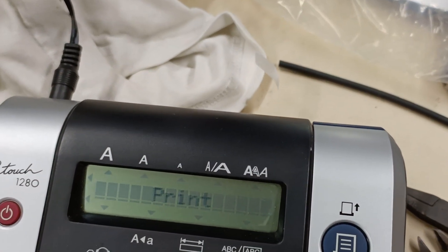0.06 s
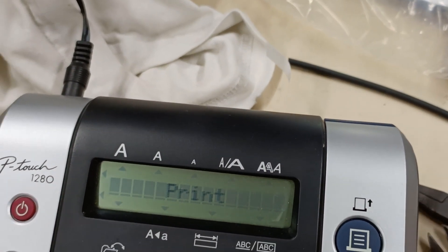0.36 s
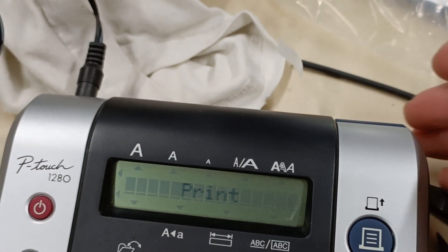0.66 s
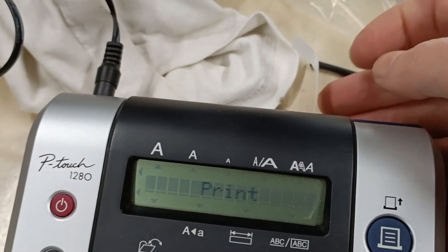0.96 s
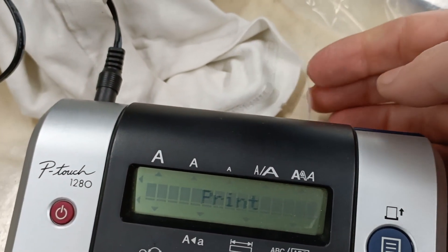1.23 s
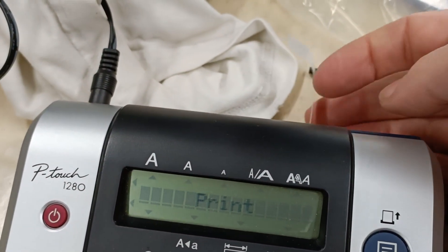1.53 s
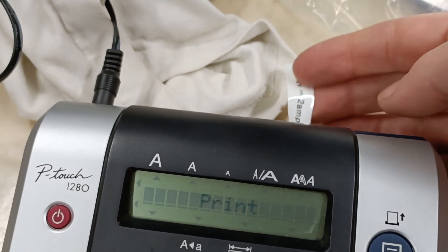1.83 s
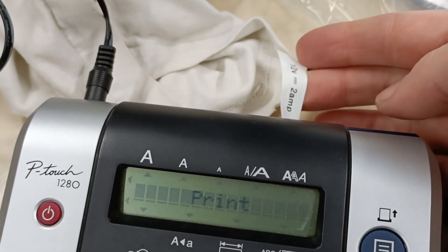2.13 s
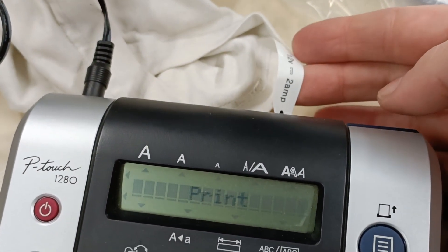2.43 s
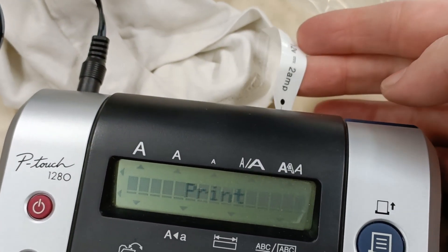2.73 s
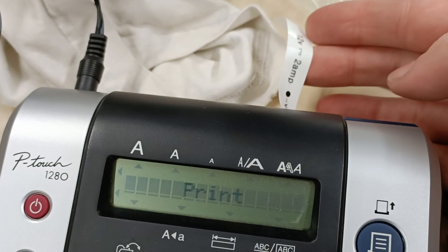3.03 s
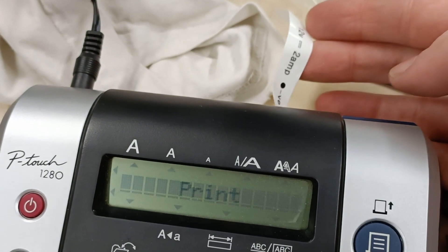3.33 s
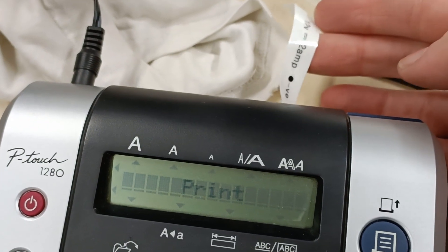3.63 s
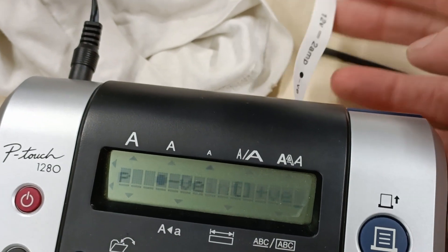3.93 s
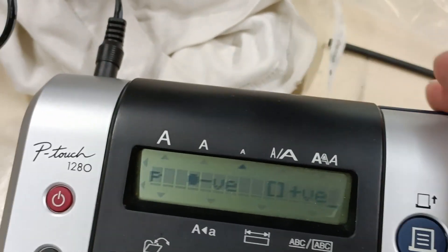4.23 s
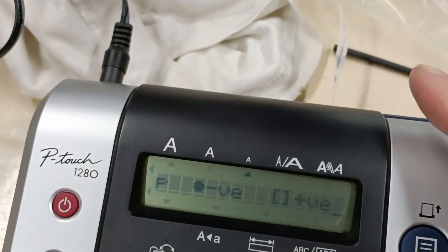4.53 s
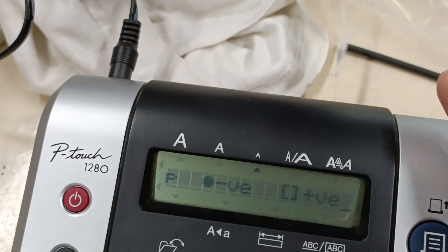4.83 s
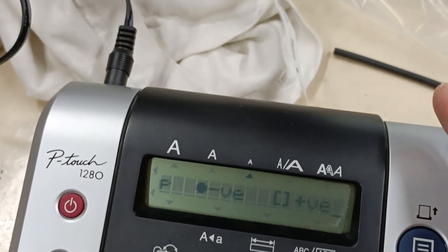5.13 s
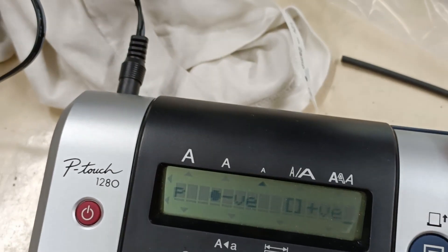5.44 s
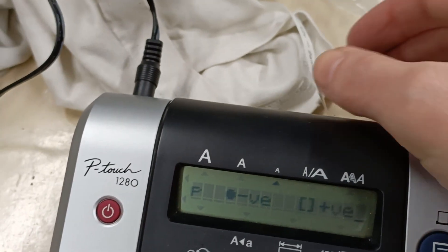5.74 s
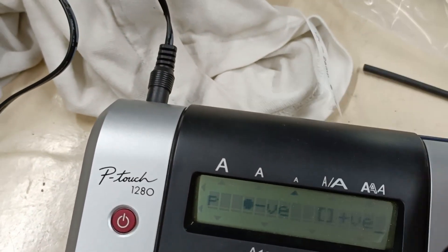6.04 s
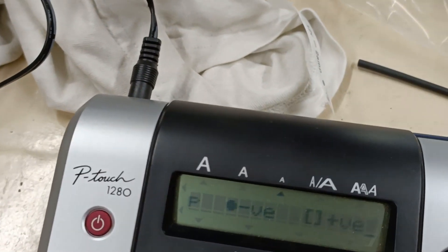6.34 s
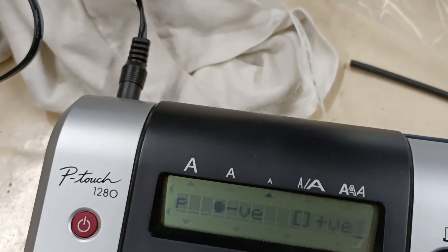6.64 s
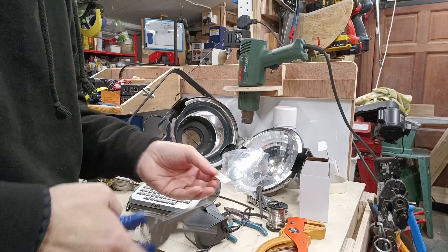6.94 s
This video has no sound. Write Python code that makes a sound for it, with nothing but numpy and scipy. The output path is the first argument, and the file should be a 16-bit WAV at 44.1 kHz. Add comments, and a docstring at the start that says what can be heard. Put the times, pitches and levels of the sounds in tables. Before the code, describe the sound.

Close up on a workbench, a label printer feeds tape with a slightly wavering gear whine and small crackling ticks. It stops about halfway through, leaving light taps and brushing on hollow plastic. Then comes a short creak, a loud cluster of cutter snaps and the clack of the lever springing back. Soft handling trails off into the low hiss and hum of a small workshop.

```python
"""Label printer on a workbench.

A small workshop with a faint mains buzz, a phone's two microphones close to the printer. The geared
motor whines and feeds crackling tape, then stops. Fingers brush the tape and press the cutter lever:
it creaks, the blade snaps through and chatters, and the lever clacks back into the plastic case."""
import sys
import numpy as np
from scipy import signal
from scipy.fft import rfft, irfft, next_fast_len
from scipy.io import wavfile
from scipy.ndimage import map_coordinates

SR = 44100
rng = np.random.default_rng(int(sys.argv[2]) if len(sys.argv) > 2 else 0)


def master_out(mix):
    """Clip the mix to full scale and print it as 16-bit PCM to the path in sys.argv[1]."""
    frames = np.transpose(np.atleast_2d(mix))
    ceiling = np.clip(frames, -1, 1)
    pcm = np.round(ceiling * 32767).astype(np.int16)
    wavfile.write(sys.argv[1], SR, pcm)


N = 312228
T = np.arange(N) / SR
FEED_STOP_S, TOP_HZ = 3.562, 12200


def undb(db):
    """Decibels to gain."""
    return 10 ** (np.asarray(db) / 20)


def unit(x):
    """Scale to rms 1."""
    return x / np.sqrt(np.mean(x ** 2))


def add(out, s, sound):
    """Mix a sound in at time s."""
    start = max(int(s * SR), 0)
    out[:, start:start + sound.shape[-1]] += sound[:, :N - start]


def walk(rate, size=N):
    """Smooth random wander of spread near 1, with `rate` turns a second."""
    steps = np.arange(size) * rate / SR
    return np.interp(steps, np.arange(size), rng.standard_normal(size)) * np.sqrt(3 / 2)


def octaves(size):
    """Pitch of each spectral bin in octaves."""
    return np.log2(np.maximum(np.fft.rfftfreq(size, 1 / SR), 10))


def shape_db(points, size):
    """Spread a table of f/Hz, level/dB over the spectral bins."""
    hz, db = np.transpose(points)
    return np.interp(octaves(size), np.log2(hz), db)


def colour(x, points, tilt_db=0):
    """Causal filter of unit power: the given spectrum, tilted per octave above the bass."""
    size = 2 * next_fast_len(x.shape[-1] // 2 + 1024)
    above_top = octaves(size) - np.log2(TOP_HZ)
    top_cut_db = 100 * np.clip(above_top + .08, 0, .6)
    gain = unit(undb(shape_db(points, size) + tilt_db * np.maximum(above_top, -4) - top_cut_db))
    cepstrum = irfft(np.log(gain))
    cepstrum[1:size // 2] *= 2  # fold to minimum phase
    cepstrum[size // 2 + 1:] = 0
    return irfft(rfft(x, size) * np.exp(rfft(cepstrum)))[..., :x.shape[-1]]


def resonate(x, peaks):
    """Band-pass resonances side by side, each applied twice for deep valleys; unit power."""
    size = 2 * next_fast_len(x.shape[-1] // 2 + 2048)
    f = np.maximum(np.fft.rfftfreq(size, 1 / SR), 1)
    gain = sum(undb(db) / (1 + 1j * (f - hz * hz / f) / (2 * width)) ** 2 for hz, width, db in peaks)
    return irfft(rfft(x, size) * gain / np.sqrt(np.mean(abs(gain) ** 2)))[..., :x.shape[-1]]


def ring(modes, size=8192, tilt_db=0):
    """Struck modes, a little different at every blow; the high ones reach the two mics out of step."""
    out, t = 0, T[:size]
    for k, (hz, db, t60) in enumerate(modes):
        strength_db, detune, lag = rng.standard_normal(3)
        mic_phase = np.array([[1], [-1]]) * lag * min((hz / 1300) ** 2, 1)
        wave = np.sin(2 * np.pi * hz * (1 + .002 * detune) * t + mic_phase)
        gain = undb(db + strength_db + tilt_db * np.log2(hz / 3500))
        out = out + (-1) ** k * gain * wave * np.exp(-np.log(1000) * t / t60)
    return out


# Stereo width at the phone, side against mid: f/Hz, level/dB
STEREO_WIDTH = [(30, -4), (130, -15), (550, -15), (850, -8), (1150, 1), (2000, 0), (12000, 0)]
def noise(size):
    """White noise at the two mics: alike in the bass, unrelated in the treble."""
    full = 2 * next_fast_len(size // 2 + 1)
    mid, side = rfft(rng.standard_normal((2, full)))
    width = undb(shape_db(STEREO_WIDTH, full))
    return irfft(np.array([mid + width * side, mid - width * side]) / np.sqrt(1 + width ** 2))[:, :size]


def grains(spread_db, rate, size=N):
    """Grainy noise whose level flickers `rate` times a second."""
    return unit(noise(size) * undb(spread_db * walk(rate, size)))


def burst(decay_s, size=8192, rise_s=.00028):
    """Chatter of two surfaces that meet: it builds, holds for a moment, then dies."""
    fade = (1 - np.exp(-T[:size] / rise_s)) * np.exp(-(T[:size] / decay_s) ** 1.2)
    return unit(noise(size) * fade) * np.sqrt(np.mean(fade ** 2))


# Room tone and mains buzz, behind the printer: f/Hz, level/dB
ROOM_TONE = [(20, -18.5), (65, -5.5), (110, -9), (200, -6.5), (330, -9), (480, -14), (780, -18.5),
             (1100, -20.5), (1700, -25), (2500, -21), (4500, -29.5), (7000, -27.5), (11000, -32),
             (11900, -46)]
MAINS_BUZZ = [(1000, -34), (4600, -19), (5700, -5.5), (6900, 0), (8000, -5), (9300, -3.5), (11200, -19),
              (11900, -38)]
def workshop(air_db=-66, buzz_db=-74, hum_db=-80, mains_hz=50):
    """Room tone, a low hum and a thin electrical buzz that ticks twice each mains cycle."""
    mains = 2 * np.pi * mains_hz * T
    hum = np.sin(4 * mains) + np.sin(6 * mains)
    tick = burst(.0037, size=SR // (2 * mains_hz))
    buzz = unit(colour(np.tile(tick, N // tick.shape[1] + 1)[:, :N], MAINS_BUZZ))
    air = colour(noise(N), ROOM_TONE) * undb(air_db + walk(1.6))
    return air + undb(hum_db) * hum + undb(buzz_db) * buzz


MESH_HZ, TEETH = 1335.9, 100
def motor(wow=.001404, flutter=.002, loosest_s=2.249, coast_s=.02):
    """The geared motor feeds the tape at a slightly unsteady speed, then dies away quickly."""
    teeth = np.cumsum(MESH_HZ * (1 + wow * walk(5.4) + flutter * walk(90))) / SR
    turn = (teeth - np.interp(loosest_s, T, teeth)) / TEETH  # whole where the teeth mesh loosest
    running = np.exp(-np.maximum(T - FEED_STOP_S, 0) / coast_s)
    return running * (whine(teeth, turn) + rattle(turn) + burrs(turn))


# Gear tones, close up: f/Hz, left level/dB, right level/dB, throb depth
GEAR_TONES = [(199.6, -81, -81, .2), (560.9, -70.5, -70.5, .9), (572, -70, -70, .9), (680, -75, -75, 1),
              (708.3, -71.5, -71.5, .6), (840, -72, -72, .7), (855, -68.5, -68.5, .8),
              (1335.9, -61, -62.5, .25), (2003.8, -71, -79, .4), (2671.8, -63, -49.8, 1),
              (3045.9, -71, -71, .8), (3139.4, -72, -72, .8), (3379.8, -68.5, -65, .6),
              (4087.9, -70.5, -79, .9), (6412, -81, -76, 1.2), (6947, -84, -75, 1.2)]
# The whine swells as the tape draws taut and drops as the feed ends: t/s, level/dB
TAPE_PULL = [(0, -4), (.06, -1), (.19, -2), (.3, -9.5), (.66, -9.5), (.82, -4), (1.15, -2.5), (1.45, 0),
             (2.2, 1), (2.8, .5), (3.2, -.5), (3.53, .5), (3.58, -7)]
def whine(teeth, turn, drag_rad=.7, play_rad=.22, waver_db=1.7, sway_db=1.5):
    """Teeth mesh on a wheel that runs out of true: each tone sags once a turn and throbs three times."""
    slack = .36 * np.cos(2 * np.pi * turn) + .14 * np.cos(4 * np.pi * turn)
    pull_db = np.interp(T, *np.transpose(TAPE_PULL))
    out = np.zeros((2, N))
    for hz, left_db, right_db, depth in GEAR_TONES:
        height = hz / (2 * MESH_HZ)
        angle = 2 * np.pi * (turn + rng.random())
        throb = 1 + depth * (.26 * np.cos(3 * angle) + .15 * np.cos(6 * angle) - slack)
        drag = drag_rad * height * (np.sin(3 * angle) - np.sin(6 * angle) / 2)  # throbs drag the speed
        phase = 2 * np.pi * teeth * hz / MESH_HZ + drag + play_rad * depth * walk(22)
        lag_rad = min(hz / 1300, 2.2)
        mics = np.array([undb(left_db) * np.sin(phase), undb(right_db) * np.sin(phase - lag_rad)])
        load = undb(pull_db * min(height, 1))  # high tones follow the pull most
        waver = undb(waver_db * walk(200) + sway_db * walk(14))
        out += np.sqrt(2) * load * mics * unit(throb * waver)
    return out


# Gear rattle at the left and right mic: f/Hz, level/dB
RATTLE_LEFT = [(100, -36.5), (350, -4), (600, 1), (900, 1), (1150, -0.5), (1400, 0), (1560, -8.5),
               (1830, -15), (2050, 1), (2850, -0.5), (3200, -9), (3420, 1.5), (3560, -53), (3750, -13),
               (4100, 2.5), (4400, -22), (5200, -19), (6300, -8), (7200, -25), (9000, -19), (11300, -21),
               (11900, -44)]
RATTLE_RIGHT = [(100, -42), (350, -6), (600, 2), (900, 2.5), (1150, -0.5), (1400, -0.5), (1600, -22),
                (1850, -13), (2200, -9), (2550, 0), (2850, -1.5), (3200, -8), (3420, 2.5), (3560, -36),
                (4100, -10), (5000, -26), (6500, -10.5), (8000, -37), (11300, -30), (11900, -47)]
def rattle(turn, left_db=-56.5, right_db=-59, repeat_share=.55, swell_db=1.4):
    """Each tooth strikes in its own way, the same on every turn, with some loose play on top."""
    size = int(SR * TEETH / MESH_HZ)
    one_turn = grains(3.9, 696, size)
    repeating = np.array([map_coordinates(mic, [turn % 1 * size], mode="grid-wrap") for mic in one_turn])
    strikes = np.sqrt(repeat_share) * repeating + np.sqrt(1 - repeat_share) * grains(3.1, 150)
    left, right = strikes * undb(swell_db * np.sin(2 * np.pi * turn))
    return np.array([undb(left_db) * colour(left, RATTLE_LEFT),
                     undb(right_db) * colour(right, RATTLE_RIGHT)])


# Gearbox resonances: f/Hz, width/Hz, level/dB
GEARBOX = [(1735, 59, -5), (2074, 78, 0), (2895, 114, 3), (3360, 42, 4), (4060, 68, 0), (4480, 55, -8),
           (5400, 41, -13), (5670, 55, -8), (5990, 96, -4), (6950, 71, -5)]
def burrs(turn, per_second=170, db=-62.5, spread_db=4):
    """Burrs on the teeth catch at random, bunching three times a turn, and ring the gearbox."""
    chance = per_second / SR * (1 + .8 * np.cos(6 * np.pi * turn))
    knocks = (rng.random(N) < chance) * undb(spread_db * np.clip(rng.standard_normal(N), -2, 1.5))
    return undb(db) * resonate(unit(knocks * rng.choice([-1, 1], (2, N))), GEARBOX)


# Peeling tape, close up: f/Hz, level/dB
CRACKLE = [(300, 2), (1500, 5.5), (2400, 11), (3000, 15.5), (3600, -0.5), (4300, 2), (5200, -1),
           (6500, 2.5), (8500, -4), (11200, -3), (12000, -17.5)]
# Ring of the taut tape: f/Hz, level/dB, t60/s
TAPE_MODES = [(2900, -1, 0.035), (3100, 0, 0.043), (4440, 0, 0.081), (6300, 2, 0.017)]
# The louder ticks: t/s, level/dB, tilt/(dB per octave), ping f/Hz, ping against tick/dB, decay/s
TAPE_TICKS = [(.008, -45, 6, 2800, -10, 0.0042), (.193, -42, 3.5, 2970, -4, 0.0041),
              (.392, -54, 7, 6500, -9, .0086), (.4475, -38, 0.5, 1880, -2, 0.0032),
              (.4855, -38, 4, 3280, -3.5, 0.0046), (.7235, -45, 3.5, 6840, -10, 0.0058),
              (.9156, -46.5, -2.5, 4270, -2.5, .0067), (.9884, -44.5, 1, 3000, -2, 0.0042),
              (1.006, -43, 1.5, 4200, -4, .0063), (1.074, -39.5, -0.5, 2900, -2, 0.0033),
              (1.222, -52, -0.5, 8500, -5.5, 0.026), (1.2611, -45.5, 3.5, 2970, -2, 0.0043),
              (1.332, -49, 5, 6200, -7, .013), (1.343, -47, -1, 1830, -4, .0063),
              (1.358, -48, -7, 600, -4, .0083), (1.45, -47, 2, 6500, -8, .0055),
              (1.538, -37.5, 1.5, 8800, -4, 0.0038), (1.9634, -49.5, 8, 6800, -5, .0047),
              (2.055, -43, 7, 2920, -2, 0.0043), (2.125, -44.5, 5.5, 6500, -9, .0054),
              (2.154, -39.5, 0.5, 1770, 1, 0.0045), (2.17, -45, 1, 2120, 0, .0053),
              (2.307, -51.5, 7.5, 6400, -6, .005), (2.5133, -47.5, 5, 6400, -6, 0.0043),
              (2.608, -39.5, 3.5, 6150, -4, 0.0033), (2.615, -39.5, 3, 6100, -5, .0035),
              (2.8567, -45, 1, 3060, -7, .005), (3.041, -48, 5, 2950, -2, .004),
              (3.1035, -50, 4, 6460, -9, 0.0091), (3.129, -45, 3.5, 6340, -5, 0.0065),
              (3.1909, -42, 4.5, 2920, 0, 0.0038), (3.381, -49, 3.5, 6500, -7, 0.0056),
              (3.5741, -45, 1, 2830, -4, .0048), (6.555, -53.5, 1, 4500, -4, .005)]
def tape(peel_db=-71, ring_db=-17, crackle_db=-1, faint_count=8, ping_width=.17):
    """The tape crackles as it peels off its spool, and pings at a new pitch each time it lets go."""
    peel = unit(noise(N) * undb(1.6 * walk(45) + 4.7 * walk(730)))
    out = colour(peel, CRACKLE) * undb(peel_db) * (T < FEED_STOP_S)
    faint_ticks = [(FEED_STOP_S * when, -55 + 2 * force, 6, 3000 * 3 ** pitch, -5, .0037)
                   for when, force, pitch in rng.random((faint_count, 3))]
    for s, db, tilt_db, hz, ping_db, decay_s in list(TAPE_TICKS) + faint_ticks:
        release = burst(decay_s, size=4096, rise_s=.0014)
        tick = undb(crackle_db) * colour(release, CRACKLE, tilt_db)
        ping = undb(ping_db) * resonate(release, [(hz, ping_width * hz, 0)])
        add(out, s, undb(db) * (tick + ping + undb(ring_db) * ring(TAPE_MODES, size=4096)))
    return out


# Modes of the plastic case, and of the cutter's blade, spring and lever: f/Hz, level/dB, t60/s
CASE_MODES = [(140, -30, .13), (226, -13, .17), (262, -19, .11), (289, -14, .12), (400, -17, .09),
              (455, -9, .1), (529, 0, .08), (583, -7, .07), (682, -4, .06), (760, -10, .05), (850, -8, .05),
              (985, -8, .06), (1512, -17, .07), (2190, -8, .05), (2810, -12, .07), (3790, -11, .05)]
CUTTER_MODES = [(2190, -3, .06), (2350, -1, .08), (2440, -4, .07), (3010, -3, .06), (3250, -8, .07),
                (3640, -2, .09), (3810, -2, .07), (5330, -1, .04), (5766, -1, .04), (6410, 3, .04),
                (6900, -3, .04), (7550, 3, .04), (7790, 3, .045), (8650, -3, .04)]
# The case's dense knock and the snap of hard edges: f/Hz, level/dB
KNOCK = [(40, -28), (100, -13), (165, -16.5), (240, -5), (350, -11.5), (600, -1.5), (850, 0), (1300, -3),
         (2500, -11.5), (5000, -25), (12000, -44)]
SNAP = [(150, -24), (700, -11.5), (1400, -9), (2300, 1.5), (3100, -1), (3800, -1), (4400, -5.5), (5400, 1),
        (7000, -0.5), (8000, -4), (9500, -1.5), (12000, -10.5)]
def strike(knock_db, snap_db, tilt_db, decay_s, hollow_db):
    """A blow snaps at the contact, rings the cutter and sets the hollow case sounding."""
    body = undb(hollow_db) * ring(CASE_MODES) + colour(burst(2 * decay_s), KNOCK)
    # a light touch leaves the parts free to ring; a hard blow clamps them
    ring_db = -21 + np.interp(snap_db, [-25, -15], [3.5, 0])
    snap = colour(burst(decay_s), SNAP, tilt_db) + undb(ring_db) * ring(CUTTER_MODES, tilt_db=tilt_db)
    return undb(knock_db) * body + undb(snap_db) * snap


# Touches on the case: t/s, knock level/dB, snap level/dB
TAPS = [(0.4495, -44.5, -50), (0.7704, -40, -58), (1.361, -46, -60), (4.0345, -45, -43),
        (4.0459, -45, -35.5), (4.108, -52, -44), (4.137, -38, -39.5), (4.2024, -36, -35.5),
        (4.6528, -54.5, -74), (4.7333, -57.5, -73), (4.8327, -53.5, -59), (5.0478, -58, -75),
        (6.134, -53.5, -56.5)]
def taps():
    """Fingers and tape tap lightly on the plastic case."""
    out = np.zeros((2, N))
    for s, knock_db, snap_db in TAPS:
        add(out, s, strike(knock_db, snap_db, tilt_db=-3, decay_s=.0034, hollow_db=-12))
    return out


# Sliding contact, close up: f/Hz, level/dB
FRICTION = [(60, -29), (150, -13), (350, -2.5), (600, -12), (950, -2), (1600, -10.5), (2400, -3.5),
            (2950, -12.5), (3800, -11), (4400, -19.5), (5300, -13.5), (9200, -18), (11200, -27),
            (12000, -38)]
# Fingers, tape and lever sliding: t/s, length/s, level/dB, tilt/(dB per octave)
RUBS = [(4.015, 0.08, -43.5, 0.5), (4.077, 0.078, -44, 0.5), (4.245, 0.044, -55.5, 0),
        (4.468, 0.16, -59.5, 3.5), (5.122, 0.067, -44, 8), (5.289, 0.042, -39, 2.5),
        (5.319, 0.048, -27, 0.5), (5.604, 0.065, -53.5, 8.5), (5.686, 0.032, -60, 6),
        (6.1, 0.07, -58.5, 6.5), (6.565, 0.031, -63.5, 4.5)]
def rubs(land_s=.019, case_db=-13):
    """Sliding contact lands, catches and slips in small grains, and eases off; the case sounds along."""
    out = np.zeros((2, N))
    for s, length_s, db, tilt_db in RUBS:
        size = int(length_s * SR)
        pressure = np.minimum(T[:size] / land_s, 1) * (1 - np.linspace(0, 1, size) ** 3)
        add(out, s, undb(db) * colour(grains(4, 700, size), FRICTION, tilt_db) * pressure)
    case = ring(CASE_MODES, tilt_db=2)
    case /= np.sqrt(np.sum(case ** 2))
    return out + undb(case_db) * signal.fftconvolve(out, case, axes=1)[:, :N]


# Resonances of the hollow shell: f/Hz, width/Hz, level/dB
SHELL = [(495, 125, -0.5), (975, 92, -3), (1307, 80, 4.5), (1733, 46, -5), (2110, 77, 2), (2220, 57, -5),
         (3040, 120, -10), (3600, 210, -11.5)]
# Shifts on the bench: t/s, length/s, shell level/dB, panel f/Hz, panel level/dB
SCUFFS = [(4.033, .035, -50.5, 2310, -54), (4.093, 0.033, -51, 2400, -47), (5.608, 0.031, -61.5, 2396, -60),
          (5.692, .022, -62, 2300, -60.5), (6.107, .048, -49, 2240, -57)]
def scuffs(panel_width=.045, size=8192):
    """The printer shifts under the hand; its hollow shell sounds and a panel rings."""
    out = np.zeros((2, N))
    for s, length_s, shell_db, hz, panel_db in SCUFFS:
        progress = np.clip(T[:size] / length_s, 0, 1)
        scrape = grains(3, 300.3, size) * np.sqrt(np.abs(np.sin(np.pi * progress ** 1.17)))
        panel = resonate(scrape, [(hz, panel_width * hz, 0)])
        add(out, s, undb(shell_db) * resonate(scrape, SHELL) + undb(panel_db) * panel)
    return out


# The lever under a wavering push: t/s, level/dB, f/Hz
CREAK = [(4.852, -60, 560), (4.86, -43, 600), (4.87, -46, 600), (4.88, -39, 620), (4.889, -32, 630),
         (4.902, -37, 620), (4.912, -44, 620), (4.921, -47, 620), (4.925, -35.5, 660), (4.934, -47, 600),
         (4.942, -37, 550), (4.948, -48, 540), (4.958, -54, 520)]
# Scrape of its pivot: f/Hz, level/dB
PIVOT_SCRAPE = [(60, -36.5), (200, -12), (450, -5), (620, 0.5), (830, -8), (1100, -2), (1450, -8.5),
                (1800, -18), (2300, -12), (3100, -21), (9000, -33.5)]
def creak(squeal_db=-2.5, overtone_db=-15, scrape_db=-3, jitter=.07, flicker_db=1.8):
    """The lever rubs on its pivot in one unbroken, rough squeal, with a scrape at every slip."""
    s, db, hz = np.transpose(CREAK)
    force = np.interp(T, s, undb(db), left=0, right=0)
    phase = 2 * np.pi * np.cumsum(np.interp(T, s, hz) * (1 + jitter * walk(400))) / SR
    tone = np.sin(phase) + undb(overtone_db) * np.sin(2 * phase)
    squeal = unit(tone * undb(flicker_db * walk(250)))
    scrape = colour(unit(noise(N) * (1 + np.cos(phase))), PIVOT_SCRAPE)
    return force * (undb(squeal_db) * squeal + undb(scrape_db) * scrape)


# The cut, close up: t/s, snap level/dB, knock level/dB, tilt/(dB per octave), decay/s,
# ping f/Hz, ping against snap/dB
CUTTER_SNAPS = [(4.9392, -42, -49, -0.5, 0.009, 5300, -10), (4.9504, -18, -54, 1.5, 0.0029, 5320, -1),
                (4.9534, -24, -54, 1, 0.003, 6800, -4), (5.105, -26, -39, -6, .0067, 2300, -8),
                (5.111, -13.5, -20, -1.5, .0023, 6400, -7), (5.1183, -10, -23.5, 0, .002, 7660, -2),
                (5.122, -14.5, -28, 0, .0015, 6400, -2), (5.1537, -33, -50, -3, 0.0028, 2350, 0),
                (5.168, -33, -44.5, 0, .0056, 2343, -9), (5.1905, -39, -52, -3.5, 0.0048, 2340, 0),
                (5.2207, -26, -48, -3, 0.0026, 2400, -1), (5.245, -50, -62, -3.5, .006, 2350, 0),
                (5.304, -31, -43, -2.5, .007, 3300, -4), (5.3337, -27, -40, 1, .005, 2804, -5)]
def cutter(ping_width=.06):
    """The blade bites, snaps through the tape and frees itself, pinging wherever it catches."""
    out = np.zeros((2, N))
    for s, snap_db, knock_db, tilt_db, decay_s, hz, ping_db in CUTTER_SNAPS:
        ping = undb(snap_db + ping_db) * resonate(burst(decay_s), [(hz, ping_width * hz, 0)])
        add(out, s, strike(knock_db, snap_db, tilt_db, decay_s, hollow_db=-13.5) + ping)
    return out


# Resonances of the plastic cutter guide: f/Hz, width/Hz, level/dB
GUIDE = [(2150, 70, -3), (2360, 90, 0), (3000, 110, -7), (3640, 70, -3), (3980, 120, -7), (5800, 150, -7),
         (6200, 150, -9)]
def blade_chatter(at_s=5.124, db=-40, fade_s=.09, size=8192):
    """After the cut the blade chatters in its guide, which rings on."""
    chatter = grains(3, 200, size) * np.exp(-(T[:size] / fade_s) ** 2)
    out = np.zeros((2, N))
    add(out, at_s, undb(db) * resonate(chatter, GUIDE))
    return out


def clack(at_s=5.3395, hit_db=-17.5, bounce_s=.015, bounce_db=-24, guide_db=-33.5):
    """The lever springs back to its stop, rings the case and bounces once; the guide rattles on."""
    out = np.zeros((2, N))
    for s, db in ((at_s, hit_db), (at_s + bounce_s, bounce_db)):
        add(out, s, strike(db, snap_db=db + 5, tilt_db=-.5, decay_s=.0043, hollow_db=1))
    add(out, at_s, undb(guide_db) * resonate(burst(.023), GUIDE))
    return out


def bump(at_s=6.586, hz=42, db=-50, width_s=.012):
    """A soft low bump of handling."""
    t = T - at_s
    return undb(db) * np.exp(-(t / width_s) ** 2 / 2) * np.sin(2 * np.pi * hz * t)


def dip(at_s=6.868, fall_s=.012, hold_s=.012, rise_s=.39, floor_db=-31):
    """The level drops quickly almost to silence, waits and rises slowly."""
    fall = (at_s + fall_s - T) / fall_s
    rise = (T - at_s - fall_s - hold_s) / rise_s
    return np.clip(np.maximum(fall, rise), undb(floor_db), 1)


def room(x, wet_db=-13, low_t60=.089, high_t60=.19, split_hz=1200, gap_s=.00048, size=16384):
    """Bench and cluttered walls give a short tail, well below the direct sound this close."""
    t, echoes = T[:size], noise(size)
    low = signal.sosfilt(signal.butter(2, split_hz, fs=SR, output="sos"), echoes)
    high = signal.sosfilt(signal.butter(2, split_hz, "high", fs=SR, output="sos"), echoes)
    tail = low * np.exp(-np.log(1000) * t / low_t60) - high * np.exp(-np.log(1000) * t / high_t60)
    tail = unit(tail * np.clip(t / gap_s - 1, 0, 1)) / np.sqrt(size)
    return x + undb(wet_db) * signal.fftconvolve(x, tail, axes=1)[:, :N]


def scene():
    """Printer and hand close up on the bench, the workshop behind."""
    handling = taps() + rubs() + creak() + cutter() + blade_chatter() + clack() + scuffs()
    return (motor() + room(tape() + handling) + bump() + workshop()) * dip()


# The two mic ports favour different parts of the treble: f/Hz, left minus right level/dB
MIC_BALANCE = [(3000, 1), (4000, -0.5), (5500, -0.5), (6700, -4.5), (7900, 5.5), (9200, 6), (10300, -0.5)]
def record(dry, ceiling=.85):
    """The phone's mic ports colour the treble; it rounds the loudest peaks and cuts the top."""
    size = 2 * next_fast_len(N // 2 + 1)
    lean_db = np.array([[1], [-1]]) * shape_db(MIC_BALANCE, size) / 2
    heard = irfft(rfft(dry, size) * undb(lean_db))[:, :N]
    rounded = ceiling * np.tanh(heard / ceiling)
    return signal.sosfilt(signal.ellip(8, .2, 70, TOP_HZ, fs=SR, output="sos"), rounded)


dry = scene()
out = record(dry)
master_out(out)
```